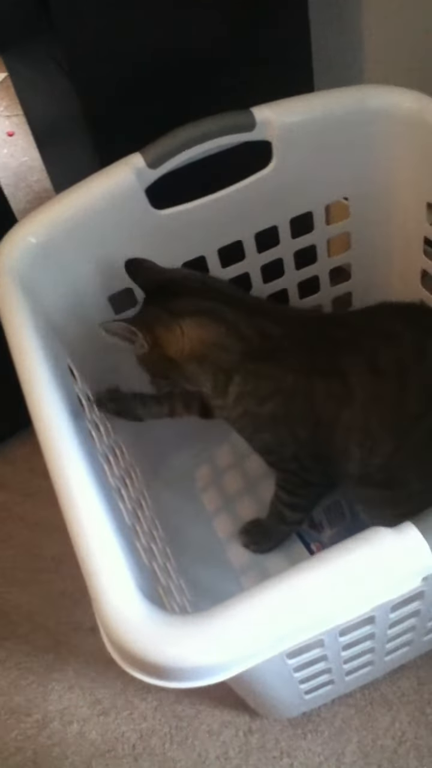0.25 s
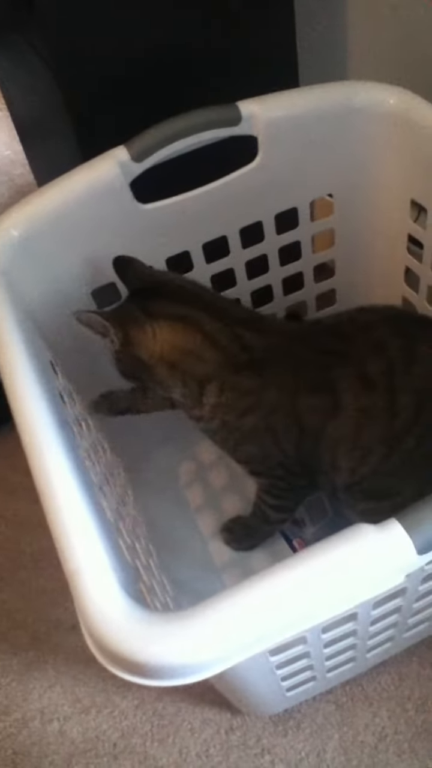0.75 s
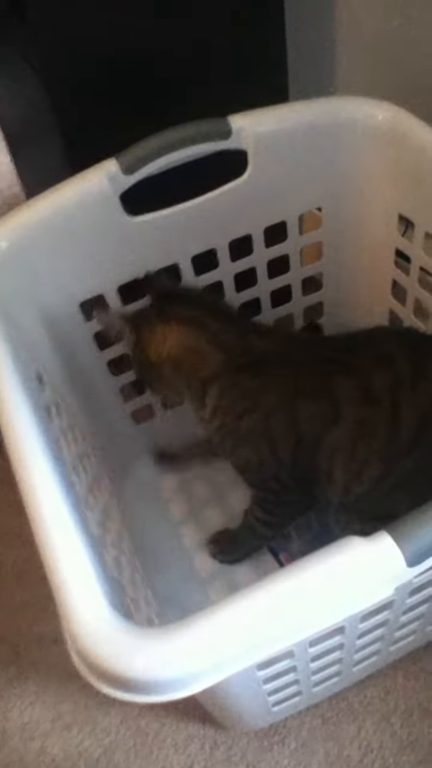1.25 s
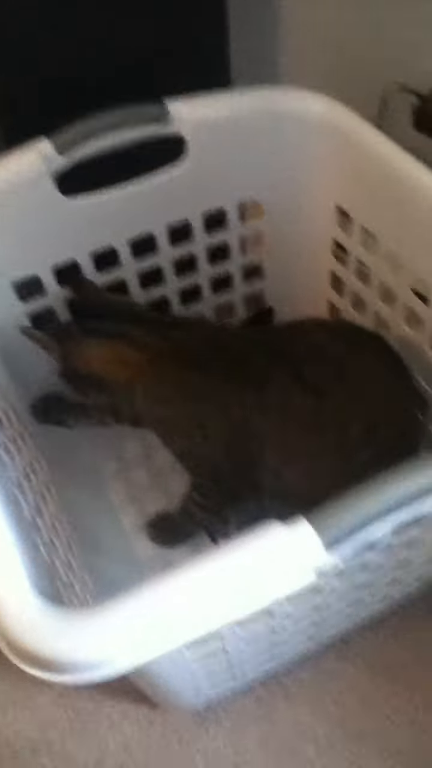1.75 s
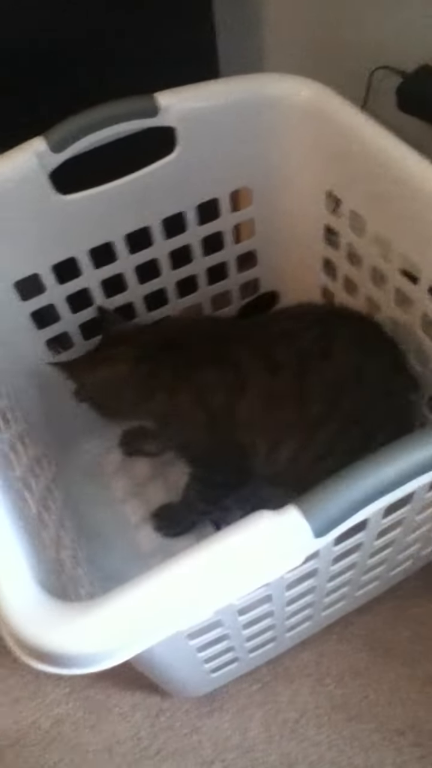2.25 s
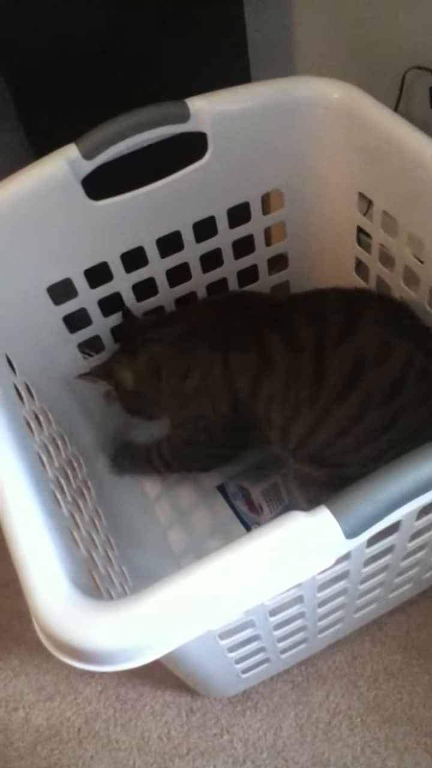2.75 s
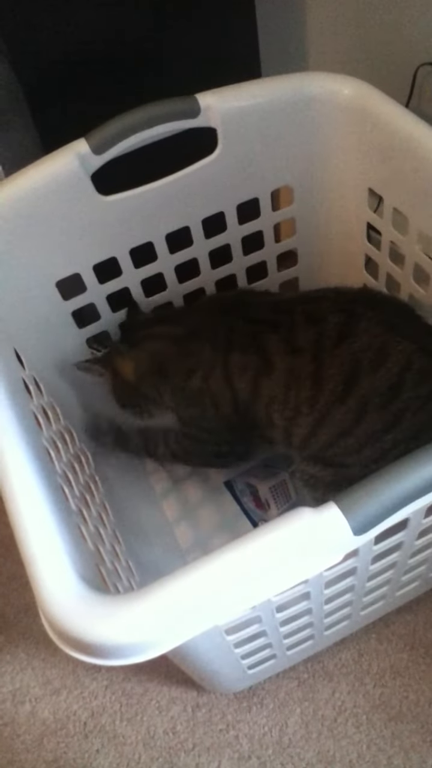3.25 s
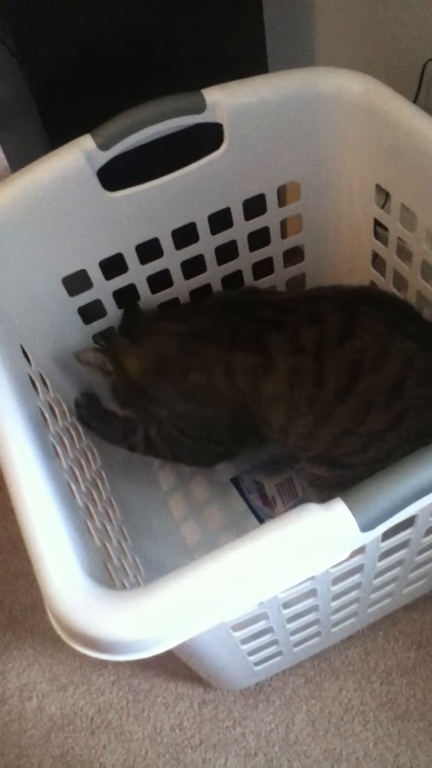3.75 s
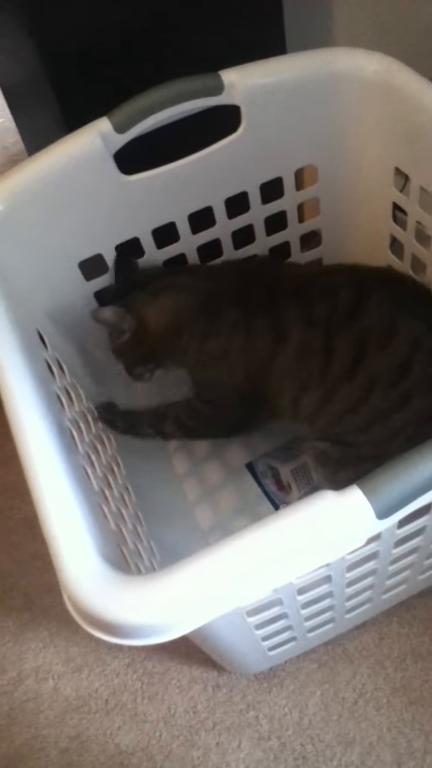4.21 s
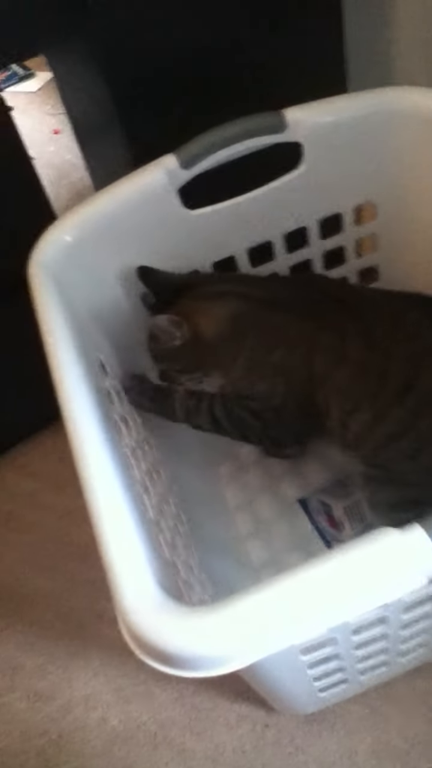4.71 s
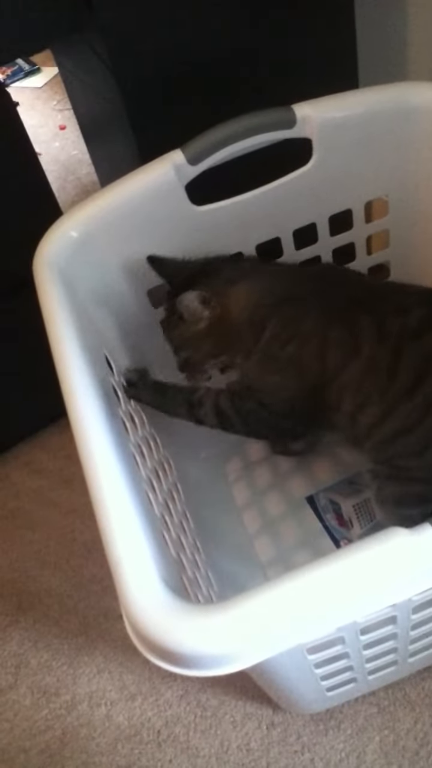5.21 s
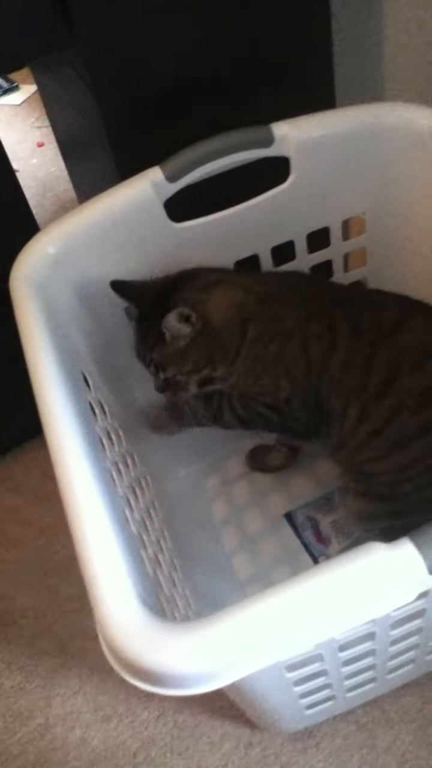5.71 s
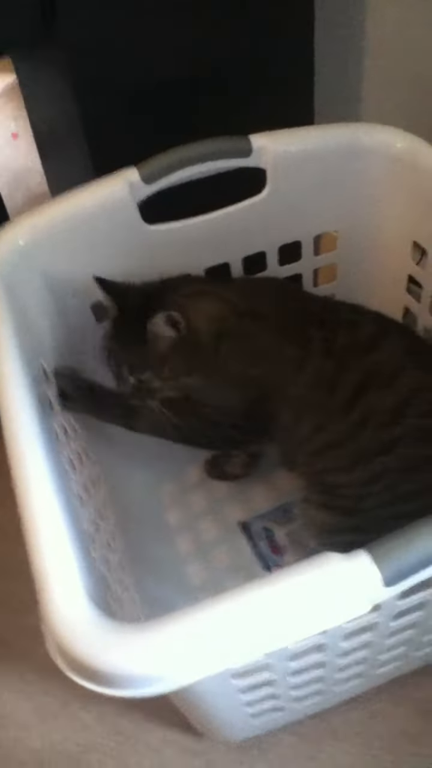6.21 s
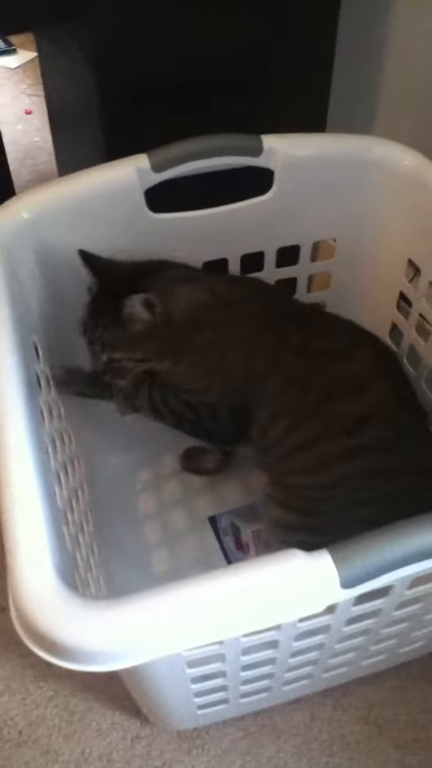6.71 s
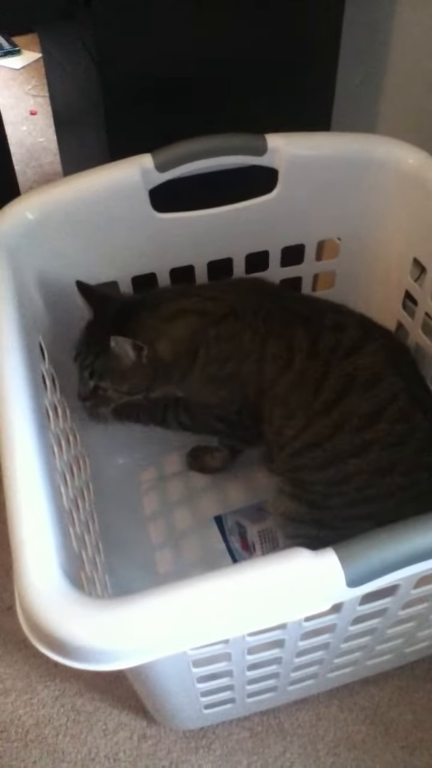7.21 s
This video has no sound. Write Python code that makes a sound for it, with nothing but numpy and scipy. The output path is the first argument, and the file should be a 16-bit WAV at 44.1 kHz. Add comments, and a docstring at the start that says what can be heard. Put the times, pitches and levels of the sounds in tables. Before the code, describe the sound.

A cat's claws tick and scrape irregularly on a hollow plastic laundry basket, with four loud booming snaps, over faint low hum and hiss.

```python
"""In a quiet carpeted room, a cat in a plastic laundry basket paws at the slotted wall, about three strokes a second.
Heard from just above the rim: claws tick and drag over the ribs as damped wall modes, sharp cracks and scraping noise;
soft paws thud in the basket's low modes, and fur brushes by once as a thin hiss.
Four times the wall lets go with a loud snap that booms through the whole basket.
Under it all: mains hum, a faint fan, and the microphone's hiss and whine."""
import sys
import numpy as np
from scipy import signal
from scipy.fft import rfft, irfft, next_fast_len
from scipy.io import wavfile
from scipy.ndimage import map_coordinates

SR = 44100
rng = np.random.default_rng(int(sys.argv[2]) if len(sys.argv) > 2 else 0)


def persist_wave(psi):
    """Save psi, clipped to +-1, as 16-bit WAV."""
    counts = np.round(np.clip(psi, -1, 1) * 32767).astype(np.int16)
    wavfile.write(sys.argv[1], SR, np.atleast_2d(counts).T)


N = 328986
T = np.arange(SR // 2) / SR  # seconds after a contact

# the basket's slow modes, levels relative: hz, level_db, t60_s
BASKET_MODES = [(76, -24, 1), (115.5, -15, 0.5), (144, -21, 0.71), (180.3, -6, 0.21), (212.2, -1.5, 0.25),
                (265.5, -3.5, 0.2), (304, -4, 0.19), (379.4, -7, 0.18), (428, -5, 0.16), (526, -0.5, 0.072),
                (603, -9, 0.12), (770, -11, 0.23), (930, -37.5, 0.39)]
# claws dragged along the wall, level of the direct scrape; the first row is a single faint tick:
# start_s, end_s, level_db
SCRAPES = [(0.317, 0.325, -48), (1.779, 2.006, -58.5), (3.148, 3.28, -58), (3.433, 3.589, -55),
           (3.92, 3.986, -50.5), (4.199, 4.308, -57.5), (4.29, 4.367, -49), (4.325, 4.346, -42),
           (4.862, 4.965, -58.5), (5.132, 5.27, -60.5), (5.31, 5.404, -61.5), (5.972, 6.065, -61),
           (6.297, 6.364, -54)]


def amp(db):
    """Decibels to gain."""
    return 10 ** (np.asarray(db) / 20)


def unit(x):
    """x at rms 1."""
    return x / np.sqrt(np.mean(x ** 2) + 1e-20)


def unit_attack(x):
    """x at rms 1 over its first 7 ms."""
    attack = x[:round(.007 * SR)]
    return x / np.sqrt(np.mean(attack ** 2))


def along(points, hz):
    """(hz, value) points joined on a log frequency axis."""
    f, v = np.transpose(points)
    return np.interp(np.log(hz + 1), np.log(f), v)


def coloured(x, points):
    """x through a causal minimum-phase filter with the (hz, gain_db) points."""
    m = 2 * next_fast_len(len(x) // 2 + 2048, real=True)
    gain_db = along(points, np.fft.rfftfreq(m, 1 / SR))
    # folding the cepstrum onto positive time makes the filter causal
    cepstrum = irfft(np.log(amp(gain_db)))
    cepstrum[1:m // 2] *= 2
    cepstrum[m // 2 + 1:] = 0
    response = np.exp(rfft(cepstrum))
    return irfft(rfft(x, m) * response, m)[:len(x)]


def wobble(rate):
    """A smooth random curve, rate knots a second."""
    knots = rng.standard_normal(int(N * rate / SR) + 4)
    return map_coordinates(knots, [np.arange(N) * rate / SR])


def add(track, s, sound):
    """Mix a sound into the track at s seconds."""
    part = track[round(s * SR):][:len(sound)]
    part += sound[:len(part)]


def background():
    """Moving air and hiss, fan lines that waver slightly, mains hum and a thin electronic whine."""
    # air noise and microphone hiss, relative: hz, level_db
    air_colour = [(20, -14), (45, -10.5), (80, -1.5), (130, 3), (200, -2.5), (300, -7.5), (450, -11.5),
                  (800, -15), (1300, -18.5), (2500, -23.5), (8000, -25), (15500, -29.5)]
    # a fan's faint lines: hz, level_db, drift_hz
    fan_lines = [(159.2, -63.5, 2.94), (239.8, -71, 2.055), (337, -72, 1.013), (830, -87, 1.87)]
    mains_hz, mains_db = 120.2, -59
    whine_hz, whine_db = 14993.5, -79

    bed = amp(-55.5) * unit(coloured(rng.standard_normal(N), air_colour))
    for hz, db, drift_hz in fan_lines:
        phase = 2 * np.pi * np.cumsum(hz + drift_hz * wobble(1.5)) / SR
        level = amp(db + 0.59 * wobble(4))
        bed += level * np.sqrt(2) * np.sin(phase)
    for hz, db in [(mains_hz, mains_db), (whine_hz, whine_db)]:
        bed += amp(db) * np.sqrt(2) * np.sin(2 * np.pi * hz * np.arange(N) / SR)
    return bed


def ring(modes, rise, scatter_db, detune, smear):
    """Damped modes of alternating sign; strength, tuning and phase vary a little at random from hit to hit."""
    # rise in s, detune as a fraction of each mode's frequency, smear in cycles
    hz, db, t60 = np.transpose(modes)[:, :, None]
    strength, shift, lag = rng.standard_normal((3, len(modes), 1))
    sign = (-1) ** np.arange(len(modes))[:, None]
    cycles = hz * (1 + detune * shift) * T + smear * lag
    waves = sign * np.sin(2 * np.pi * cycles)
    decay = amp(db + scatter_db * strength - 60 * T / t60)
    return unit_attack((decay * waves).sum(0) * (1 - np.exp(-T / rise)))


def crack(t60, spike):
    """A claw slips off an edge: one sharp release and a short broad burst."""
    # claw on plastic, relative: hz, level_db
    crack_colour = [(200, -17), (700, -18.5), (1500, 11.5), (4000, 0.5), (7000, -9.5), (11000, -20.5),
                    (16000, -37)]
    burst = rng.standard_normal(len(T)) * amp(-60 * T / t60)
    release = spike * (T == 0)
    return unit_attack(coloured(burst / np.linalg.norm(burst) + release, crack_colour))


def reflections(near_db, near_t60, room_db):
    """Response of the space: quick bounces between the basket's walls, then the room's longer tail."""
    # the room's decay: hz, t60_s
    room_decay = [(150, 0.59), (500, 0.25), (1200, 0.29), (3000, 0.28), (7000, 0.26), (14000, 0.41)]
    hz, t, z = signal.stft(rng.standard_normal(len(T)), SR, nperseg=256)
    fading = z * amp(-60 * t / along(room_decay, hz)[:, None])
    room = signal.istft(fading, SR, nperseg=256)[1][:len(T)] * (T > .006)
    bounces = rng.standard_normal(len(T)) ** 3  # cubed: sparse and spiky
    near = bounces * amp(-60 * T / near_t60) * (T > .003)
    return amp(near_db) * near / np.linalg.norm(near) + amp(room_db) * room / np.linalg.norm(room)


def snaps():
    """The flexed panel springs back, clatters, and the blow spreads into the basket's low modes."""
    # the wall springs back, level of the direct slap's attack: start_s, level_db
    releases = [(.0381, -20.5), (.8722, -19), (5.6997, -17.5), (6.8378, -18.5)]
    # the whole panel as it springs back, levels relative: hz, level_db, t60_s
    panel_modes = [(371, -11.5, 0.032), (614, -9.5, 0.043), (666, -17, 0.041), (890, -1, 0.019),
                   (1050, -10, 0.026), (1260, -1, 0.021), (1554, 5, 0.02), (1972, -17.5, 0.045),
                   (2160, -10, 0.022), (2555, -5, 0.018), (3520, -6.5, 0.011), (3820, -13, 0.021),
                   (5150, -19, 0.018)]
    # a snap's clatter, averaged over all directions, relative: hz, level_db
    clatter_colour = [(40, -36), (120, -18), (250, -12.5), (450, -2), (800, 0), (1200, -4), (1650, -1.5),
                      (2000, -9.5), (2700, -11), (4000, -17.5), (6000, -30), (10000, -37.5), (15000, -53)]
    boom_db, boom_lag_s = -20, .00414  # the boom against its snap

    track = np.zeros(N)
    for s, db in releases:
        panel = ring(panel_modes, rise=.002, scatter_db=.8, detune=.008, smear=.12)
        slap = unit_attack(panel + amp(-9.0) * crack(t60=0.019, spike=0.34))
        bounced = reflections(near_db=-4.5, near_t60=0.061, room_db=-5.5)
        clatter = amp(35.5) * coloured(bounced, clatter_colour)
        boom = ring(BASKET_MODES, rise=.009, scatter_db=1, detune=.004, smear=.15)
        add(track, s, amp(db) * (slap + clatter))
        add(track, s + boom_lag_s, amp(db + boom_db) * boom)
    return track


def tick(body_db, tip_db):
    """One contact rings the wall: the paw's weight gives body, a bare claw tip gives bite and edge."""
    # the wall around a claw, levels relative: hz, level_db, t60_s
    wall_modes = [(620, -9, 0.042), (910, -10.5, 0.027), (1151, 1.5, 0.029), (1175, -18, 0.19),
                  (1669, -4.5, 0.06), (1840, -1, 0.018), (2296, -3, 0.025), (2410, -10, 0.028),
                  (3427, -7, 0.023), (4520, 0, 0.0049), (5200, -20, 0.028), (7200, -53.5, 0.015)]
    # a tick's sound, averaged over all directions, relative: hz, level_db
    spread_colour = [(100, -19), (400, -10.5), (700, -2), (1120, 2), (1600, 2), (2400, -2.5), (4000, -9),
                     (7000, -22.5), (11000, -33.5), (15000, -47)]
    # a barer claw lifts the 3 kHz bite and, faster, the 6.5 kHz edge (dB per dB)
    bite_per_tip, edge_per_tip = 0.9, 1.24

    bite_db, edge_db = bite_per_tip * tip_db, edge_per_tip * tip_db
    touch = [(60, -17), (250, body_db / 2 - 2), (600, body_db), (1000, 3.0),
             (1600, -2.0), (2800, bite_db), (3800, bite_db), (6500, edge_db)]
    wall = ring(wall_modes, rise=0.00014, scatter_db=0.5, detune=0.044, smear=0.18)
    slip = crack(t60=.016, spike=.6)
    direct = unit_attack(coloured(wall + amp(-3) * slip, touch))
    # sound that leaves in all directions comes back with the single modes blurred together
    click = 1. * (T == 0)
    spread = unit_attack(coloured(coloured(click, spread_colour), touch))
    space = reflections(near_db=-5.5, near_t60=0.072, room_db=-8.0)
    return direct + signal.fftconvolve(spread, space)[:len(T)]


def claws():
    """The claws strike the wall, often two in quick succession."""
    # clear claw contacts, level of the direct attack; body = weight of the paw behind it,
    # tip = soft pad (-) to bare claw (+): start_s, level_db, body_db, tip_db
    contacts = [(.3098, -34.5, 7, 4.5), (.382, -33.5, 0, -8), (0.3967, -36, 6.5, 3.5),
                (0.5363, -25.5, -2, -8), (1.1837, -33.5, 4, 3.5), (1.1932, -30, 1, 0),
                (1.5424, -28, -5.5, 0.5), (1.7814, -41, 11.5, 8.5), (1.8447, -44.5, -3, 9),
                (2.0409, -33.5, 1, 15), (2.0503, -35, -1, 10), (2.305, -37.5, 9, 5.5), (2.3234, -40, 0, 2),
                (2.531, -37, 15.5, 15.5), (2.612, -50, 25, 4), (2.8163, -30.5, 11, 13.5),
                (2.881, -29.5, -5, 8.5), (2.8879, -31, -10, -3), (3.128, -34, 6, -6),
                (3.1478, -31.5, -4, 2), (3.2072, -35.5, -6, 0), (3.4051, -28.5, -4.5, -8.5),
                (3.4355, -34, 5.5, 5.5), (3.573, -44.5, -5, 13), (3.6062, -30, 2, 7),
                (3.775, -23.5, -3.5, -8.5), (3.7943, -30, 5, -1.5), (3.95, -39, -12, 6), (4.165, -35, 2, 1),
                (4.1843, -33.5, 0, 3), (4.2911, -37.5, 2, 14), (4.315, -38.5, 1, 15),
                (4.3296, -27.5, 11, 4.5), (4.526, -39.5, 7, -6.5), (4.5698, -33.5, 13.5, -14),
                (4.8139, -35.5, 3, 1.5), (4.8576, -37.5, 1.5, -3.5), (5.1475, -43.5, -5, 2),
                (5.1701, -33.5, -7, 0.5), (5.3513, -35, 2, 4.5), (5.358, -32, 11.5, 13),
                (5.5359, -35.5, 7.5, -14.5), (5.9332, -33, -14, 4.5), (5.94, -37.5, 6, 6),
                (5.9647, -37, -3, -1), (6.3454, -34, -3.5, -1), (6.4988, -31, 5, 7), (6.524, -46.5, 5, 23),
                (6.662, -50, 10.5, -9), (7.0929, -31.5, -3, 2.5), (7.1148, -31, -3, -0.5)]
    track = np.zeros(N)
    for s, db, body_db, tip_db in contacts:
        add(track, s, amp(db) * tick(body_db, tip_db))
    return track


def drags():
    """A dragged claw sticks and slips: tiny ticks in uneven clumps, each ringing on briefly in the space."""
    # a claw scraping plastic, relative: hz, level_db
    scrape_colour = [(60, -45), (300, -14), (700, -4), (1100, 6), (1600, 5), (2400, 5.5), (4500, 0.5),
                     (7000, -8.5), (15000, -22)]
    track = np.zeros(N)
    for start, end, db in SCRAPES:
        n = round(max(end - start, .01) * SR)  # at least 10 ms
        sparse = (rng.random(n) < 800 / SR) * rng.standard_normal(n)  # about 800 slips a second
        slips = unit(sparse) + .4 * rng.standard_normal(n)
        # a random curve of 130 knots a second gathers the slips into clumps
        grip_db = 6.1 * map_coordinates(rng.standard_normal(n), [np.arange(n) * 130 / SR], order=1)
        scrape = unit(coloured(amp(grip_db) * slips, scrape_colour))
        stroke = amp(db) * scrape * signal.windows.tukey(n, .3)
        space = reflections(near_db=-3.0, near_t60=.02, room_db=-2.5)
        add(track, start, stroke)
        add(track, start, signal.fftconvolve(stroke, space))
    return track


def thuds():
    """A soft paw stirs only the low modes, and the room answers."""
    # a paw lands, level of the boom's attack before muffling: start_s, level_db
    landings = [(.399, -52.5), (2.612, -61), (4.334, -46), (4.572, -41.5), (6.501, -50.5)]
    echo_gain_db = 43  # makes up for the dull filter on the echo
    track = np.zeros(N)
    for s, db in landings:
        boom = ring(BASKET_MODES, rise=.004, scatter_db=1.5, detune=.02, smear=.2)
        muffled = coloured(boom, [(150, 1), (200, -4.5), (290, 1), (900, -9.5)])
        space = reflections(near_db=-1.5, near_t60=0.11, room_db=-5.0)
        echo = coloured(space, [(40, -31), (130, 4), (330, 1), (800, 0), (2000, -39)])
        add(track, s, amp(db) * (muffled + amp(echo_gain_db) * echo))
    return track


def catches():
    """Along each drag long enough, the claw catches on the ribs at uneven gaps and gives faint ticks."""
    gap_s, jitter = .035, .35  # mean gap, and the greatest shift in gaps
    catch_db, scatter_db = 5, 3  # level against the drag, and its scatter
    body_db, tip_db = -1.5, 5.5
    track = np.zeros(N)
    for start, end, db in SCRAPES:
        for s in np.arange(start + gap_s / 2, end, gap_s):
            late, strength = rng.uniform(-1, 1), rng.standard_normal()
            level = amp(db + catch_db + scatter_db * strength)
            add(track, s + jitter * gap_s * late, level * tick(body_db, tip_db))
    return track


def brush(start, end, db):
    """Fur sweeps along the smooth wall: a thin swelling hiss."""
    sweep = np.linspace(0, 1, round(max(end - start, .01) * SR))
    noise = rng.standard_normal(len(sweep))
    hiss = unit(coloured(noise, [(1500, -20), (5000, 3), (12000, -3), (16000, -8)]))
    track = np.zeros(N)
    add(track, start, amp(db) * hiss * np.sin(np.pi * sweep ** 2))  # peaks late in the sweep
    return track


def scene():
    """The cat at work in the basket, heard from just above the rim."""
    fur = brush(start=1.95, end=2.035, db=-57.5)
    return (background() + snaps() + thuds() + claws() + drags() + fur + catches())[None]


def record(dry):
    """The recorder keeps nothing above its band limit."""
    top_hz = 16150
    m = next_fast_len(N + SR // 2)
    kept = np.fft.rfftfreq(m, 1 / SR) < top_hz
    return irfft(rfft(dry, m) * kept, m)[..., :N]


dry = scene()
out = record(dry)
persist_wave(out)
```